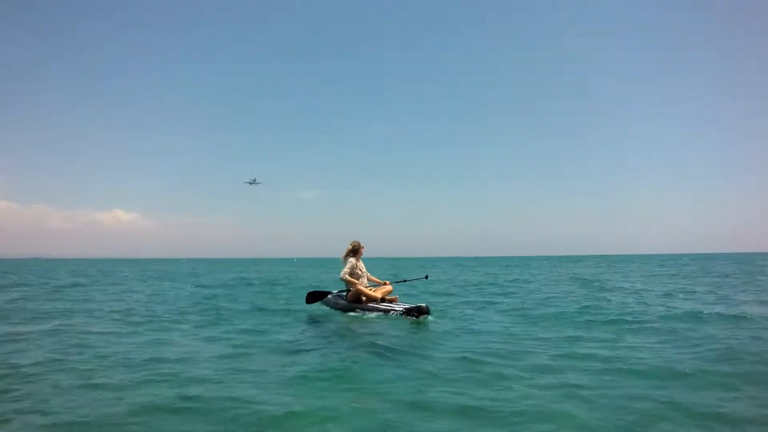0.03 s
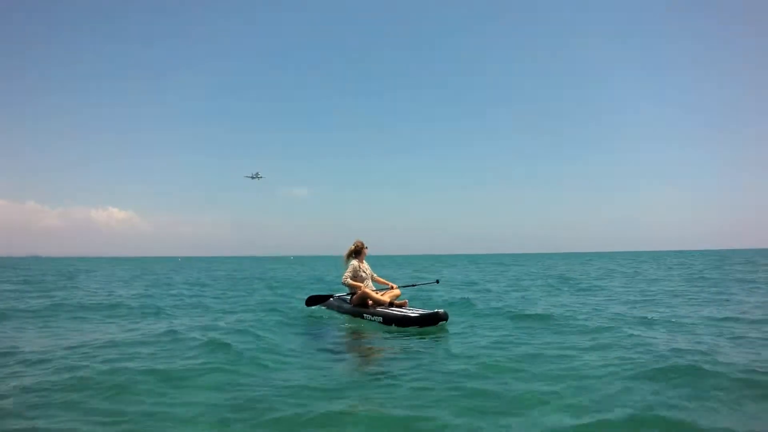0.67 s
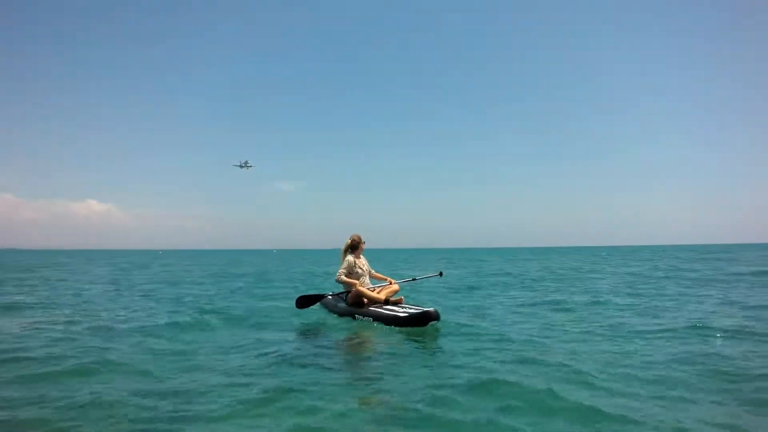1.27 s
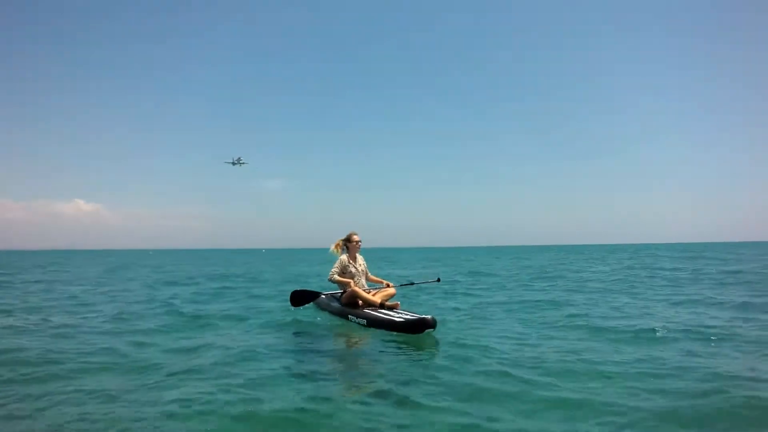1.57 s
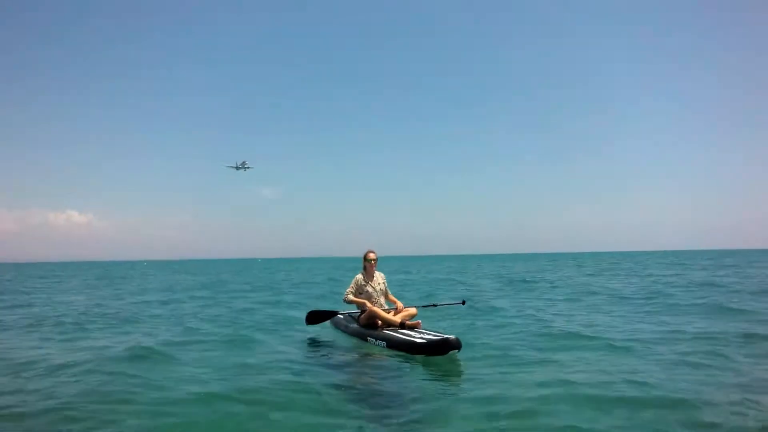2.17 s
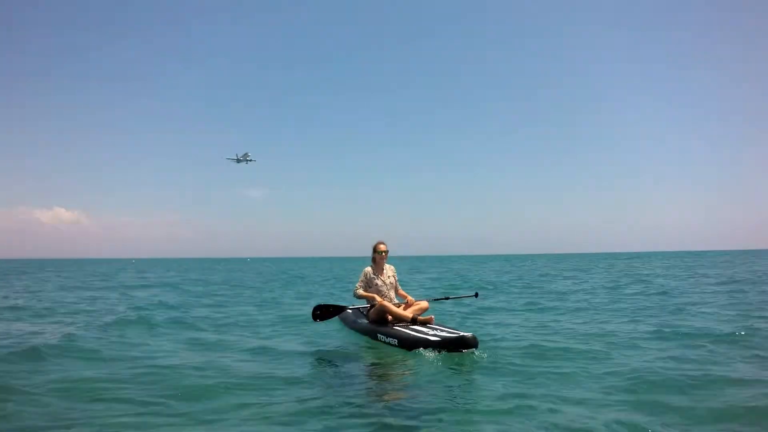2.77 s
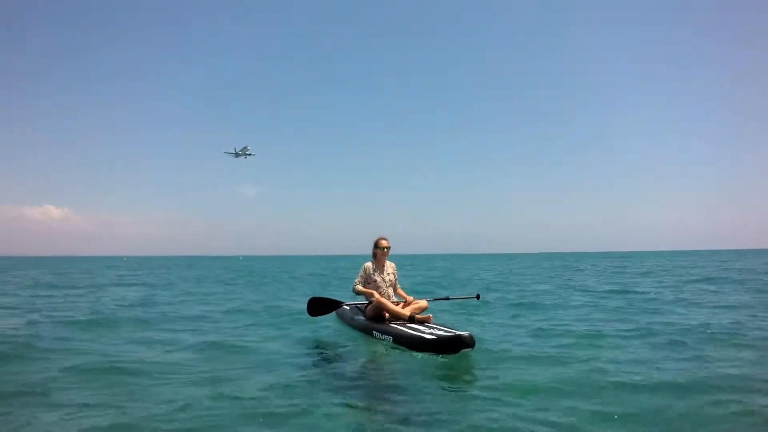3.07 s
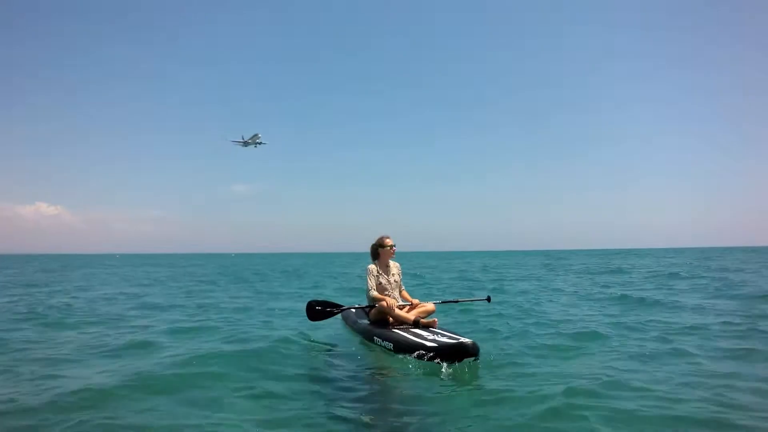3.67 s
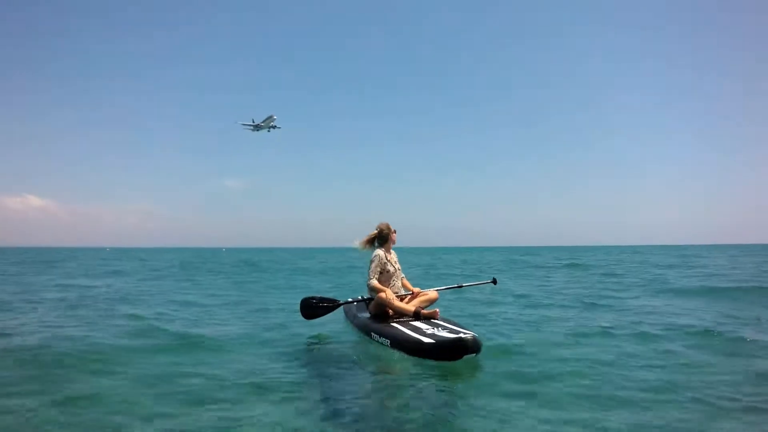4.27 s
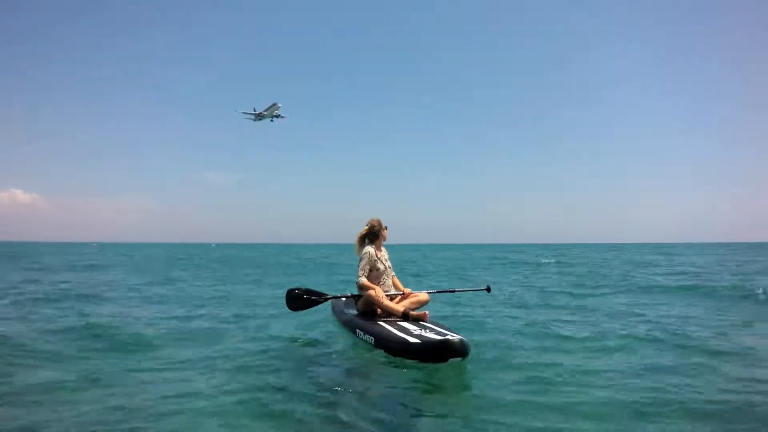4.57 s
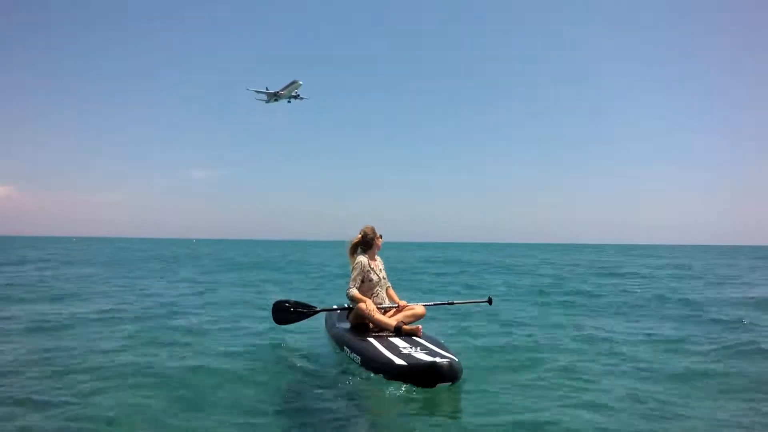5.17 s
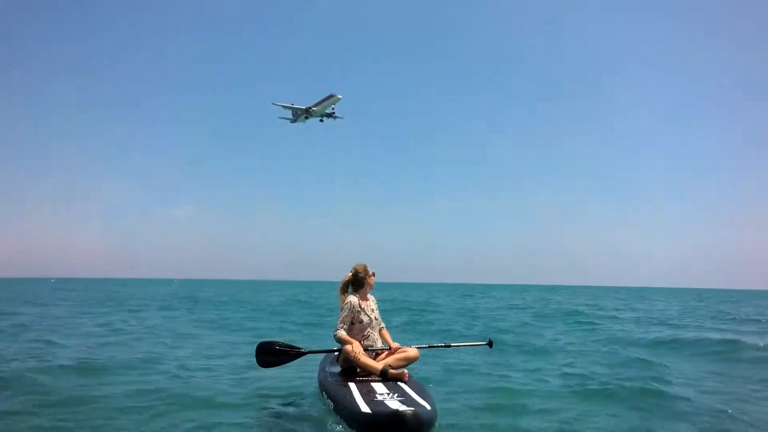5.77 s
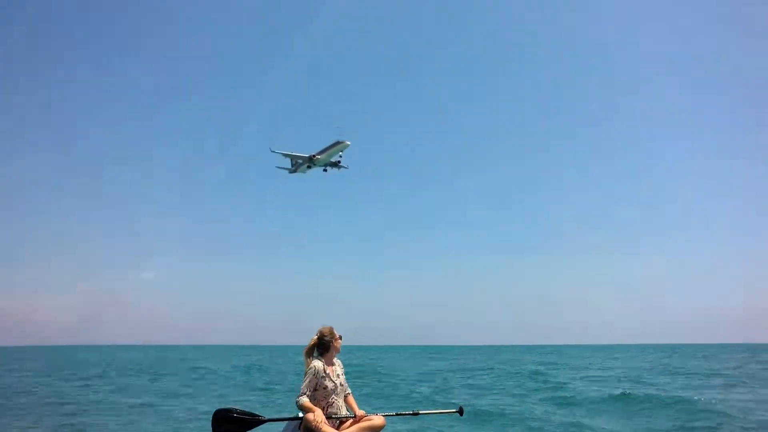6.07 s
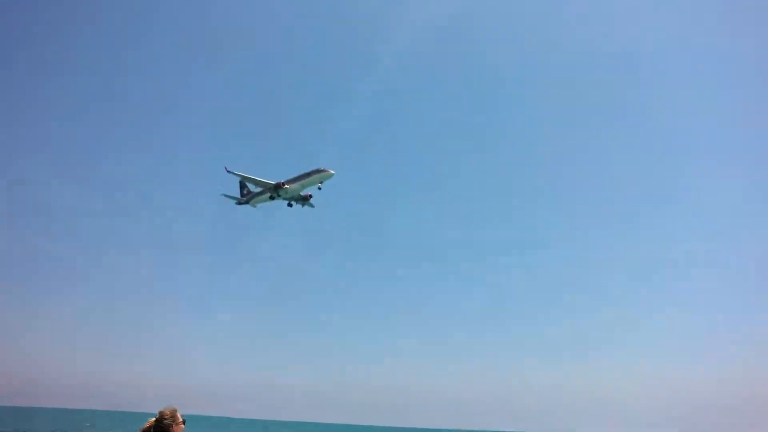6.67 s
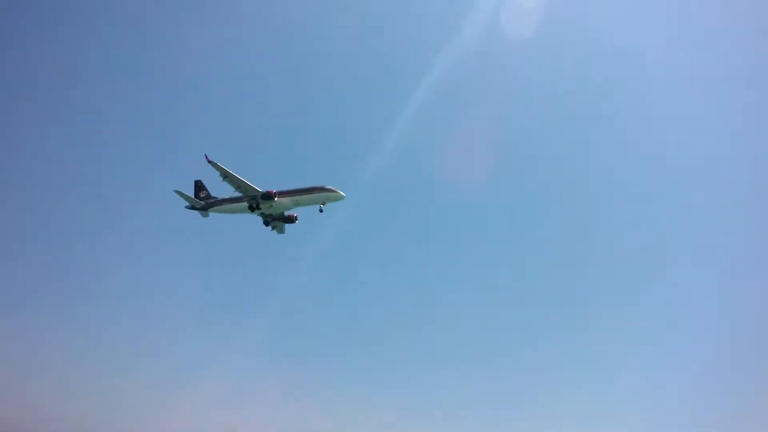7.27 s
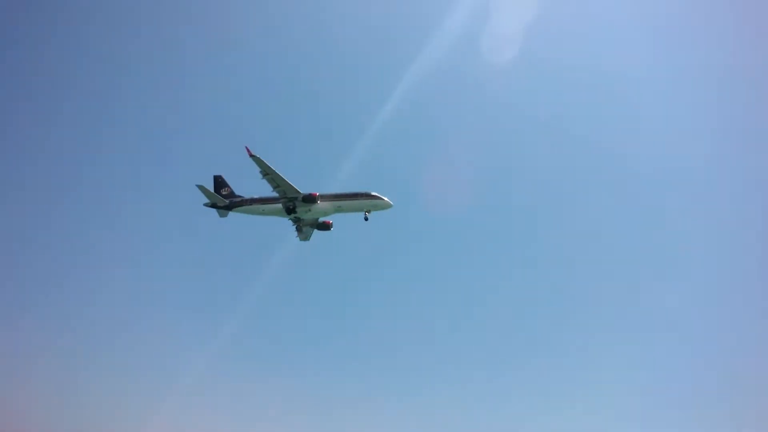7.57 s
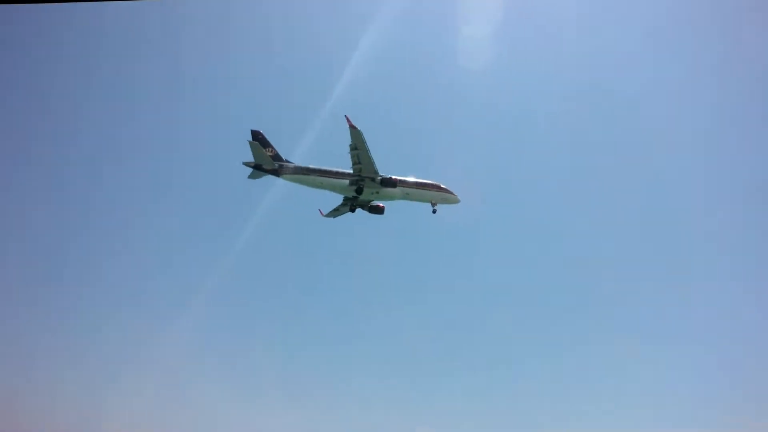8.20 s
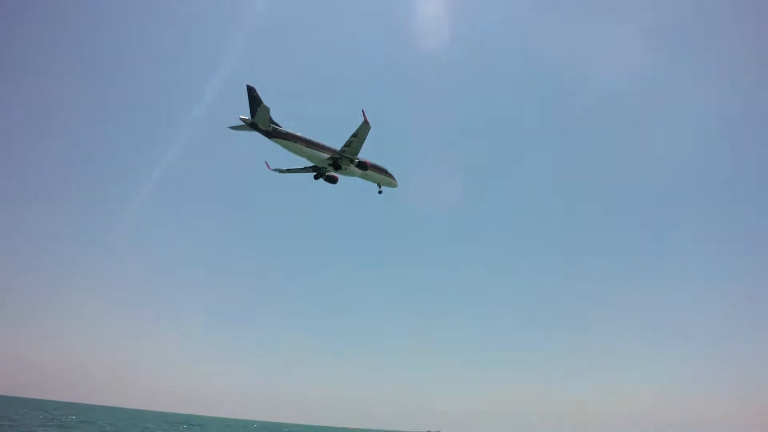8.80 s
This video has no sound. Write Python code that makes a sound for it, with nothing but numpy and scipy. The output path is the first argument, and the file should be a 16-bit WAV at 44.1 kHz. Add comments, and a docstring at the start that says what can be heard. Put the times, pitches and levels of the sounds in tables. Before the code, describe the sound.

From the start, a distant jet airliner makes a hollow, rushing roar over a faint, low sea breeze. Two tiny drips fall close by, at about 0.6 and 2.4 seconds. From 1 second, a high engine whine wavers in and out, lifting slightly in pitch around 3 seconds. The roar gradually swells, growing fuller and brighter from about 5 seconds as thin turbine whistles join. Dull knocks on the microphone's case come at 5.4 and 6.5 seconds, then a quick, much louder cluster at 7.5. The whistles then surge and flutter, sliding down in pitch as the jet passes low overhead around 8.3 seconds. Roar and whistles are still strong at the end, near 8.8 seconds. The microphone sits just above the water in a waterproof case, giving a boxy, ringing tone, with the left side quieter and muffled.

```python
"""A jet airliner comes in low over the sea to land, heard from a small camera in a waterproof case.
First come a breeze, two drips and a far roar of churning air, with the whine of the engine fans on top.
The roar swells and brightens as the jet nears, coloured by its echo off the water and by the ringing case.
From about 5.4 s to 7.5 s the case is bumped a few times. Near the end the jet passes, and its turbine
whistles surge and fall in pitch (the Doppler shift)."""
import sys
import numpy as np
from scipy import signal
from scipy.fft import rfft, irfft, next_fast_len
from scipy.io import wavfile
from scipy.ndimage import uniform_filter1d

SR = 44100
rng = np.random.default_rng(int(sys.argv[2]) if len(sys.argv) > 2 else 0)


def materialize(psi):
    """Save the field psi as 16-bit PCM at rate SR to the path in sys.argv[1].

    A 1-D psi becomes a single channel; in a 2-D psi each row is a channel.
    """
    bounded = np.clip(np.atleast_2d(psi).T, -1, 1)
    quanta = np.round(bounded * 32767).astype(np.int16)
    wavfile.write(sys.argv[1], SR, quanta)


N = 389753
TIME = np.arange(N) / SR
# the jet flies straight at a steady speed and is heard side-on at PASS_S
SPEED_M_PER_S, CLOSEST_M, PASS_S, SOUND_M_PER_S = 52.14, 46, 8.27, 343

# how strong the muffled left microphone is next to the right: f/Hz, level/dB
LEFT_LEVEL = [(60, -14), (92, -13), (140, -10.5), (210, -11.5), (330, -10.5), (500, -11.5), (760, -9.5),
              (1170, -7.5), (1780, -28.5), (2730, -13.5), (4170, -15), (6370, -15), (9730, -12.5),
              (14900, -26)]
# how alike the two microphones sound: f/Hz, likeness (1 = the same)
LIKENESS = [(60, .99), (300, 0.98), (650, 0.95), (1200, 1), (1800, 0.8), (3000, 0.79), (7000, 0.9),
            (15000, .45)]
# how far the left wave runs ahead of the right: f/Hz, phase/rad
LEFT_LEAD = [(60, 0.5), (400, 0), (800, 0.55), (1000, 0.1), (1200, -1.5), (1460, -2), (1890, 3), (2240, 0),
             (3010, -2.5), (3530, -2), (4820, -5), (5600, -8.5), (6550, -4.5), (12000, -5)]
# tone colour of the breeze and distant sea: f/Hz, level/dB
BREEZE_SHAPE = [(15, -25), (45, -5.5), (90, -6), (190, 6), (320, -18), (450, -4), (750, -6.5), (950, -23),
                (2500, -49), (6000, -42)]
# drips of water close by: t/s, level/dB, f/Hz, decay/s
WATER_DRIPS = [(0.61, -62, 4900, .03), (2.368, -50, 4800, .005)]
# bumps on the case: t/s, level/dB, f/Hz
CASE_BUMPS = [(5.441, -35, 280), (6.509, -29, 328), (7.451, -27, 295), (7.472, -21, 248),
              (7.483, -16.5, 310), (7.492, -16, 212)]
# pitches the case boosts or swallows: f/Hz, width/Hz, level/dB from the horizon, level/dB from higher up
CASE_BANDS = [(258, 146, 6.5, 8.5), (400, 69, -3, 3), (643, 176, 8, 5), (781, 57, 6, 7.5),
              (939, 255.0, -4.5, -2.4), (1375, 310, -3, 0.3), (1617.0, 113, -9, -2.1),
              (1810, 170, 0.6, 1.0), (1947.0, 114, -1, -5.5), (2460, 240, 0, -4), (2832, 124, 8, 4.5),
              (3500, 520, 8, 6), (4306, 1130, 9.5, 4.5), (5076, 580, 13, 11), (5700, 330, 7, 2.5),
              (6535, 350, 4, 6.5), (7930, 387.0, 10, 2.5), (9400, 1500, 12, 5.5), (12000, 1200, 10, 3.5)]
# fan whine, beamed forward and fading in and out through the moving air: t/s, level/dB
FAN_WHINE = [(0.8, -68.5), (1.04, -48), (1.18, -54.5), (1.42, -39.5), (1.73, -57.5), (1.95, -45),
             (2.46, -46), (2.61, -58), (2.92, -48), (3.9, -51), (4.33, -42.5), (4.6, -51), (4.9, -50),
             (5.02, -39), (5.13, -45), (6.03, -48), (6.55, -57), (6.74, -42), (7.2, -47.5), (7.7, -54)]
# nudges of the throttle: t/s, spread/s, share of extra speed for the first fan, for the second fan
THROTTLE_NUDGES = [(3.03, .42, .028, .05), (7.4, 0.65, .021, .014)]
# overtones of the second fan: multiple of its pitch, level/dB
FAN_OVERTONES = [(2, 0.75), (3, -2.4)]
# how those overtones rise and sink together: t/s, level/dB
FAN_OVERTONE_LEVEL = [(0, -86), (2.6, -77), (3.2, -70), (4, -64.5), (4.9, -78), (5.3, -56), (5.6, -67),
                      (6.5, -55), (7.2, -71), (8.84, -53)]
# main turbine whistle, beamed sideways and surging as it passes: t/s, level/dB
MAIN_WHISTLE = [(4.4, -88), (5.1, -60.5), (7.5, -53), (7.72, -41.5), (8.08, -37.5), (8.2, -31.5),
                (8.34, -32.5), (8.41, -45.5), (8.48, -33), (8.54, -37.5), (8.64, -29.5), (8.73, -44),
                (8.84, -34)]
# other blade rows, each beamed at its own angle: multiple of the whistle, loudest t/s, spread/s, level/dB
TURBINE_STAGES = [(.59, 3.6, 0.36, -61.5), (0.609, 7.28, 0.31, -45.5), (.872, 4.5, 0.52, -57.5),
                  (.922, 5.4, .6, -58), (.914, 7.0, 0.21, -49.5), (.922, 7.79, 0.23, -42),
                  (.932, 8.15, 0.14, -43), (1.225, 8.15, 0.15, -48), (1.345, 7.1, 0.37, -55.5),
                  (1.722, 7.1, 0.51, -62.5), (2.095, 7.3, 0.35, -62)]
# tone colour of the roar from the side: f/Hz, level/dB
SIDE_ROAR = [(20.0, -39.0), (45.0, -39), (90.0, -10.5), (170.0, -3), (300.0, 1.46), (430.0, -0.5),
             (920.0, -1.64), (1300.0, 6), (2400.0, -1.0), (4200.0, -11), (6500.0, -7.5), (8000.0, -14),
             (12000.0, -20.5), (15500.0, -31.5)]
# how much more roar goes straight ahead than sideways: f/Hz, level/dB
FORWARD_BOOST = [(90.0, 1.5), (170.0, 11), (300.0, 3.5), (600.0, 1), (1300.0, 8.6), (2400.0, 9.5),
                 (5000.0, 7.5), (10000.0, 8.5)]
# the roar's low middle tones, dipping near 4 s and swelling strongly from 6 s to 7.5 s: t/s, level/dB
ROAR_BODY = [(0.0, -3.5), (1.2, -2), (3.5, -3.5), (4.0, -8), (5.0, -4.7), (6.0, 1.2), (6.6, 7.5),
             (7.4, 8.5), (7.9, 0.3), (8.84, -2.5)]
# the roar's middle and high tones, swelling and sinking on the way: t/s, level/dB
ROAR_SWELL = [(0.0, 11), (0.73, 9), (1.3, 11.5), (1.85, 2.8), (2.43, 6), (3.73, 4), (3.94, 7), (4.13, 6),
              (4.77, -1.3), (5.43, 0), (6.28, -6.5), (6.75, -7.5), (6.96, -11.5), (7.95, -5), (8.2, 0.1),
              (8.76, 6.5)]
# the camera bobbing over the water: t/s, height/m
CAMERA_HEIGHT = [(0.0, 0.26), (1.0, 0.6), (2.0, 0.63), (3.0, 0.59), (3.9, 0.62), (4.4, 0.69), (5.0, 0.56),
                 (5.6, 0.61), (6.1, 0.5), (6.5, 0.65), (7.0, 0.597), (7.4, 0.6), (7.9, 0.456), (8.84, 0.58)]


def gain_of(db):
    """Turns decibels into a number to multiply a wave by."""
    return 10 ** (np.asarray(db) / 20)


def unit_level(x):
    """Scales a signal to an average power of 1."""
    return x / np.sqrt(np.mean(abs(x) ** 2) + 1e-20)


def at_pitch(table, hz):
    """Looks up a table by frequency, giving each octave equal room."""
    f, value = np.transpose(table)
    return np.interp(np.log(hz + 1), np.log(f + 1), value)


def at_time(table, t):
    """Looks up a table by time, with straight lines between its points."""
    return np.interp(t, *np.transpose(table))


def wander(rate_hz):
    """A smooth random drift in size and phase, mostly slower than rate_hz."""
    t = TIME[::16]
    f = np.fft.fftfreq(next_fast_len(len(t)), 16 / SR)
    draws = rng.standard_normal((len(f), 2)) @ [1, 1j]
    drift = np.fft.ifft(draws * np.exp(-.5 * (f / rate_hz) ** 2))[:len(t)]
    return np.interp(TIME, t, unit_level(drift))


def mic_gains(hz):
    """How the left and right microphones hear each frequency: the case muffles the left one."""
    left, lead = gain_of(at_pitch(LEFT_LEVEL, hz)), at_pitch(LEFT_LEAD, hz)
    centre = np.sqrt(1 + left ** 2 + 2 * left * at_pitch(LIKENESS, hz) * np.cos(lead)) / 2
    return np.array([left * np.exp(1j * lead), np.ones_like(left)]) / centre


def hiss(level_db=-59):
    """The faint, even noise that the two microphones make themselves."""
    return gain_of(level_db) * rng.standard_normal((2, N))


def breeze(level_db=-56):
    """A steady low rush of wind and water."""
    hz = np.fft.rfftfreq(N, 1 / SR)
    spectrum = rfft(rng.standard_normal(N)) * gain_of(at_pitch(BREEZE_SHAPE, hz))
    return gain_of(level_db) * unit_level(irfft(spectrum * mic_gains(hz), N))


def drips(band_ratio=1.3):
    """Tiny splashes: each is a sudden burst of high noise that dies at once."""
    out = np.zeros((2, N))
    for s, db, hz, decay in WATER_DRIPS:
        band = signal.butter(2, [hz / band_ratio, hz * band_ratio], "bandpass", fs=SR, output="sos")
        noise = unit_level(signal.sosfilt(band, rng.standard_normal(N)))
        fade = (TIME > s) * np.exp(-abs(TIME - s) / decay)
        out += abs(mic_gains(np.array([hz]))) * gain_of(db) * noise * fade
    return out


def bumps(spread_s=0.0024):
    """Dull knocks: the case wall swings back and forth a few times."""
    out = np.zeros((2, N))
    for s, db, hz in CASE_BUMPS:
        t = TIME - s
        knock = np.exp(-(t / spread_s) ** 2 / 2) * np.cos(2 * np.pi * hz * t)
        out += abs(mic_gains(np.array([hz]))) * gain_of(db) * knock
    return out


def flight(t):
    """The jet as heard at times t: distance in metres, cosine of the angle off its nose, pitch factor."""
    mach = SPEED_M_PER_S / SOUND_M_PER_S
    past_m = SPEED_M_PER_S * (t - PASS_S) + mach * CLOSEST_M
    # sound takes time to arrive, so we hear the jet where it was earlier
    distance = (np.sqrt(past_m ** 2 + (1 - mach ** 2) * CLOSEST_M ** 2) - mach * past_m) / (1 - mach ** 2)
    ahead = mach - past_m / distance
    return distance, ahead, 1 / (1 - mach * ahead)


def blade_tone(hz, db, rough, width_hz):
    """The note of spinning blades; churning air smears the share `rough` of its power into noise."""
    note = np.exp(2j * np.pi * np.cumsum(hz) / SR)
    flicker = np.sqrt(1 - rough) + np.sqrt(rough) * wander(width_hz)
    mics = mic_gains(hz[::256]).repeat(256, 1)[:, :N]
    return np.sqrt(2) * (mics * gain_of(db) * note * flicker).real


def fans(blade_hz=(1853, 1842), fan_db=-1.5, second_db=-11, haze_db=-11, creep_per_s=.0012):
    """Two fans whine almost in step, creeping up in speed, nudged by the throttle and Doppler shifted."""
    speed = 1 + creep_per_s * (TIME - TIME.mean())
    for s, spread, *shares in THROTTLE_NUDGES:
        speed = speed + np.outer(shares, np.exp(-((TIME - s) / spread) ** 2))
    _, _, doppler = flight(TIME)
    first_hz, second_hz = speed * doppler * np.array(blade_hz)[:, None]
    level_db = at_time(FAN_WHINE, TIME) + fan_db
    # the whine flickers more as the jet nears
    out = blade_tone(first_hz, level_db, rough=np.interp(TIME, [2.4, 4], [.02, .17]), width_hz=8.9)
    out += blade_tone(second_hz, level_db + second_db, rough=1, width_hz=15)
    out += blade_tone(first_hz, level_db + haze_db, rough=0.89, width_hz=100)
    overtone_db = at_time(FAN_OVERTONE_LEVEL, TIME)
    for multiple, db in FAN_OVERTONES:
        out += blade_tone(second_hz * multiple, overtone_db + db, rough=1, width_hz=9.6)
    return out


def turbines(blade_hz=4970, whistle_db=-2, scream_db=-7):
    """Rows of turbine blades whistle; the Doppler shift lowers them all together as the jet passes."""
    _, _, doppler = flight(TIME)
    hz, level_db = blade_hz * doppler, at_time(MAIN_WHISTLE, TIME)
    out = blade_tone(hz, level_db + whistle_db, rough=0.6, width_hz=18)
    # crossing the hot exhaust smears the whistle into a wide scream
    out += blade_tone(hz, level_db + scream_db, rough=1, width_hz=250)
    for multiple, s, spread, db in TURBINE_STAGES:
        off_beam = (TIME - s) / spread
        beam_db = -20 * np.log10(1 + off_beam ** 4 / 2 + off_beam ** 2 / 2)
        out += blade_tone(hz * multiple, db + beam_db, rough=0.77, width_hz=48)
    return out


def case_colour_db(t, hz):
    """The case rings at some pitches and swallows others; the mix shifts as the jet looms higher."""
    horizon_db, above_db = sum(np.outer(db, 1 / (1 + (2 * (hz - f) / width) ** 4))
                               for f, width, *db in CASE_BANDS)
    return horizon_db + (above_db - horizon_db) * np.interp(t, [3.28, 5.0], [0, 1])


def sea_echo(t, hz, distance, strength=0.38, fade_hz=4250):
    """The echo off the water lifts some pitches and weakens others; waves scatter its treble."""
    # the echo comes later the higher the jet stands in the sky
    lag_s = 2 * at_time(CAMERA_HEIGHT, t) * CLOSEST_M / distance / SOUND_M_PER_S
    return abs(1 + strength * np.exp(-(hz / fade_hz) ** 2 - 2j * np.pi * hz * lag_s))


def eddies_db(t, hz, noise, patchy_db=2.07, flutter_db=0.77):
    """Swirls of air on the way make the treble swell and twinkle more than the bass."""
    patches = uniform_filter1d(noise, size=16, axis=0)
    patches = unit_level(uniform_filter1d(patches, size=14, axis=1))
    flutter = np.interp(t, TIME, unit_level(wander(rate_hz=11.7).real))
    twinkle_db = (patchy_db * patches + flutter_db * flutter) * hz / (hz + 900)
    return at_time(ROAR_SWELL, t) * hz / (hz + 290) + twinkle_db


def beam_db(hz, ahead, cone_db=11.5, cone_deg=35, width_deg=17.9, above_hz=3540):
    """The engines send extra roar forward, and their intakes beam a cone of hiss around the nose."""
    cone = np.exp(-((np.degrees(np.arccos(ahead)) - cone_deg) / width_deg) ** 2)
    return at_pitch(FORWARD_BOOST, hz) * ahead + cone_db * cone * hz ** 2 / (hz ** 2 + above_hz ** 2)


def roar(level_db=-51, body_hz=574, body_octaves=0.79, absorb_db_per_m=0.07):
    """Churning air makes a wide noise; distance weakens it and the air soaks up its treble."""
    frame, hop = 1024, 256
    hz = np.fft.rfftfreq(frame, 1 / SR)
    t = np.arange(N // hop + 5)[:, None] * hop / SR
    noise = rng.standard_normal((5, len(t), len(hz)))
    distance, ahead, _ = flight(t)
    body_db = at_time(ROAR_BODY, t) * np.exp(-(np.log2((hz + 1) / body_hz) / body_octaves) ** 2)
    source_db = level_db + at_pitch(SIDE_ROAR, hz) + beam_db(hz, ahead) + body_db
    absorbed_db = absorb_db_per_m * distance * (hz / 4000) ** .693
    colour_db = source_db - absorbed_db + eddies_db(t, hz, noise[4]) + case_colour_db(t, hz)
    gain = gain_of(colour_db) * sea_echo(t, hz, distance) * CLOSEST_M / distance
    # the left microphone shares part of the right one's noise
    alike = at_pitch(LIKENESS, hz)
    right = noise[0] + 1j * noise[1]
    left = alike * right + np.sqrt(1 - alike ** 2) * (noise[2] + 1j * noise[3])
    spectra = np.array([left, right]) * gain * mic_gains(hz)[:, None]
    _, wave = signal.istft(spectra.transpose(0, 2, 1), nperseg=frame, noverlap=frame - hop)
    return np.sqrt(1.5) * wave[:, :N]


def scene():
    """Adds up the jet, the knocks, the water, the sea air and the microphone hiss."""
    return roar() + fans() + turbines() + bumps() + drips() + breeze() + hiss()


def record(dry):
    """The camera cuts off the very highest treble."""
    lowpass = signal.firwin(2047, cutoff=15480, window=("kaiser", 9), fs=SR)
    return signal.oaconvolve(dry, lowpass[None], "same")


dry = scene()
out = record(dry)
materialize(out)
```